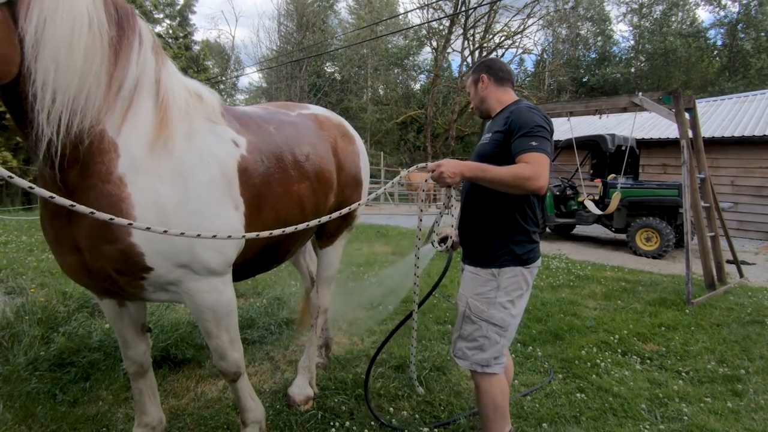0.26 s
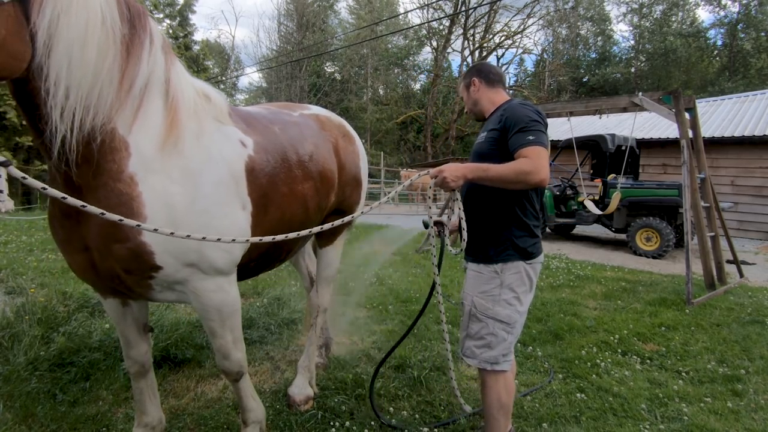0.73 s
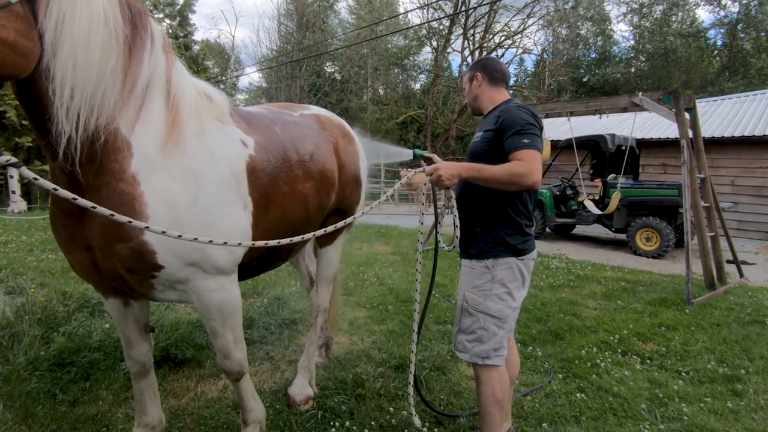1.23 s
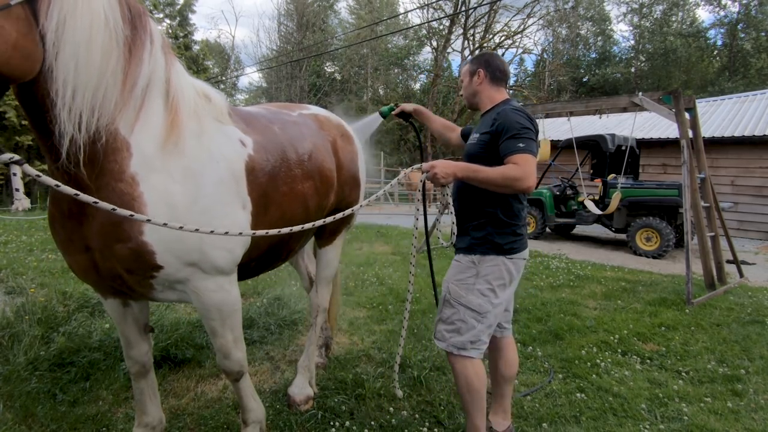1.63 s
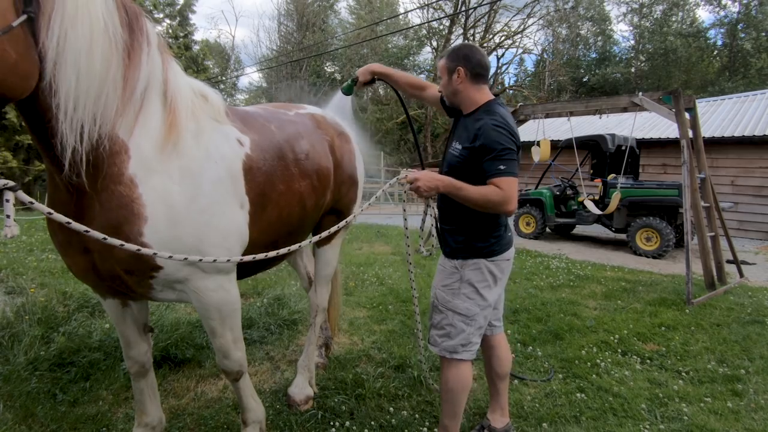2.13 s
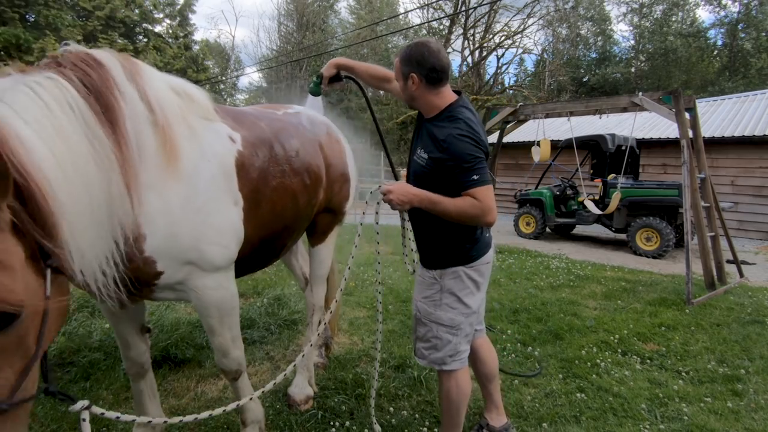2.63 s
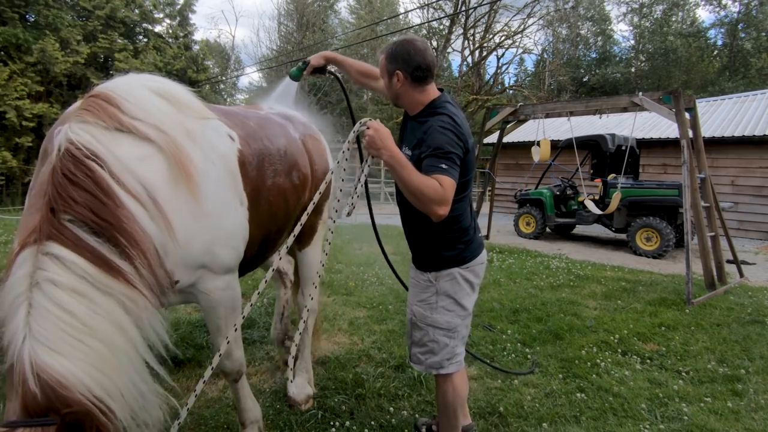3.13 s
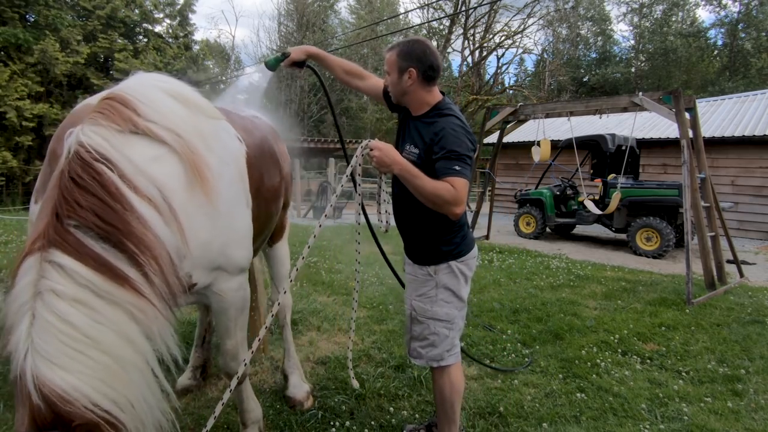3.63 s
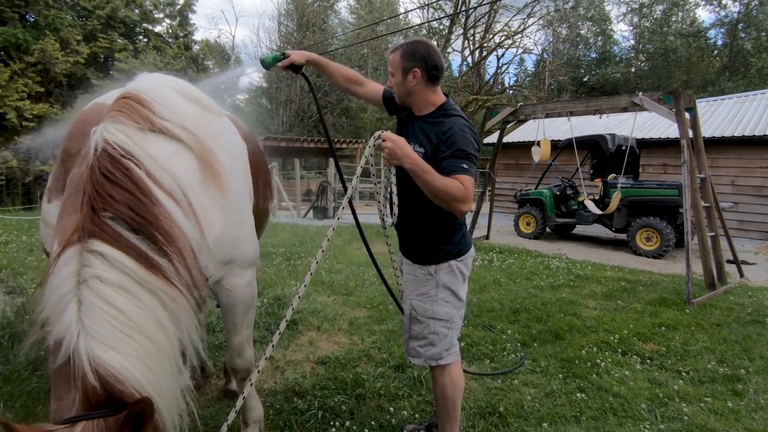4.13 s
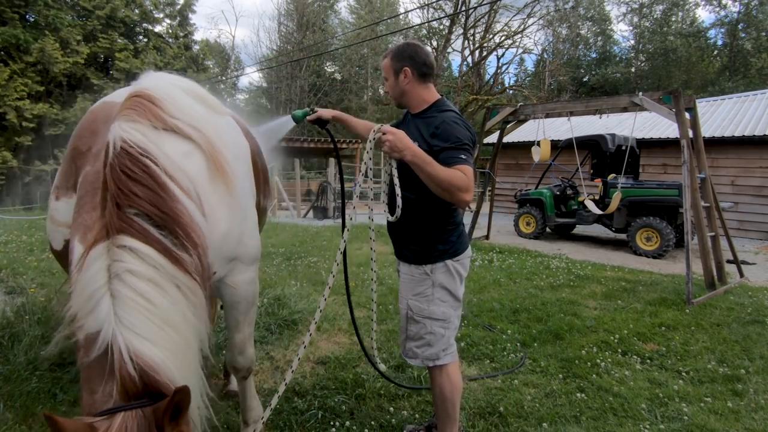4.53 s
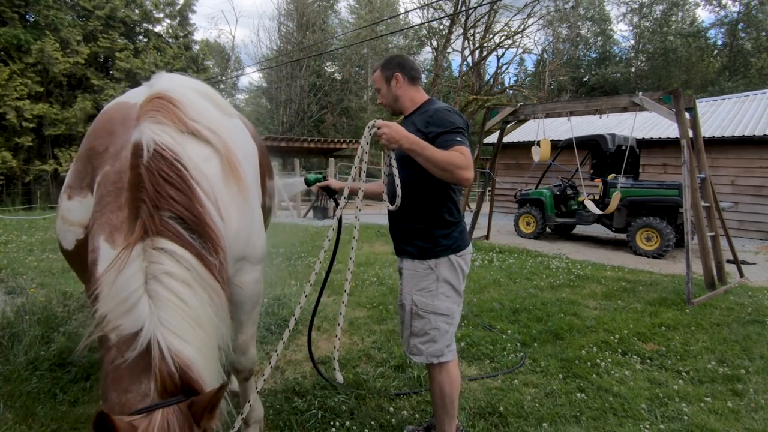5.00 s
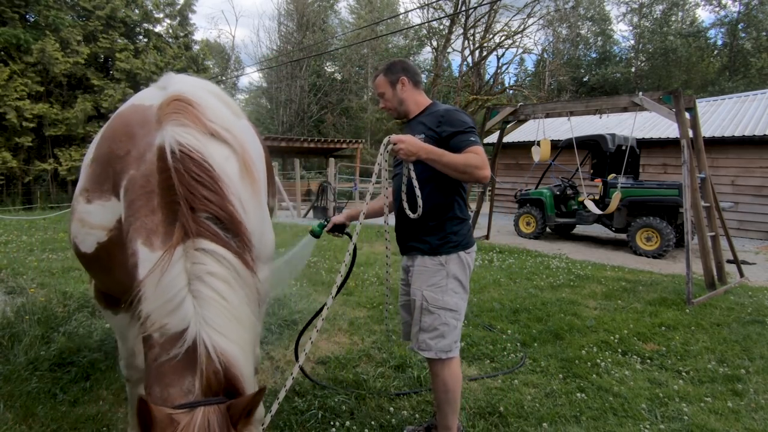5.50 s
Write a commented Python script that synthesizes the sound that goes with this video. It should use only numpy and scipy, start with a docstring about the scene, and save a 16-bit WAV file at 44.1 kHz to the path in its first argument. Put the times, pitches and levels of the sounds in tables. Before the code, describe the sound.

Outdoors, water spray swishes on and off wet horsehair over a low engine throb, a brief bird chirp and later gusts of wind.

```python
"""Garden hose on a horse

A jet sweeps on and off a horse's coat on a lawn: random impacts, thousands a second, are filtered into
splash, deeper patter and a fine hiss of mist. An engine of harmonic tones and noise throbs in the yard
and fades. Filtered noise makes wind at the microphone, gliding sines a bird, and a steady stream of
filtered impacts the wash of trees and of water falling in the grass."""
import sys
import numpy as np
from scipy import signal
from scipy.fft import rfft, irfft
from scipy.io import wavfile

SR = 44100
rng = np.random.default_rng(int(sys.argv[2]) if len(sys.argv) > 2 else 0)


def wav_record(signal):
    """Record a signal, one row per channel, as 16-bit PCM in the file named by sys.argv[1]."""
    frames = np.transpose(np.atleast_2d(signal))
    bounded = np.clip(frames, -1, 1)
    # unit amplitude maps onto the largest positive 16-bit level
    quanta = np.round(bounded * 32767).astype(np.int16)
    wavfile.write(sys.argv[1], SR, quanta)


N = 254016
TIME = np.arange(N) / SR  # s

# Wind-noise spectra, shared by gusts and buffets: (frequency [Hz], relative density [dB per Hz])
RUMBLE_COLOUR = [(25, -35), (50, -27), (75, -30), (100, -9.5), (150, 5.5), (215, -3), (300, -19),
                 (600, -56)]
RUSTLE_COLOUR = [(120, -11), (280, 6), (400, 1), (650, -5), (850, -8), (1200, -13.5)]


def from_db(db):
    """Amplitude ratio: 20 dB is a factor of ten."""
    return 10 ** (np.asarray(db) / 20)


def unit(x):
    """Normalisation: scales a signal to rms 1."""
    return x / np.sqrt(np.mean(x ** 2) + 1e-20)


def at_hz(points, hz):
    """Linear interpolation of a spectrum table on a logarithmic frequency axis."""
    f, value = np.transpose(points)
    return np.interp(np.log(hz + 1), np.log(f + 1), value)


def levels(rows):
    """Envelopes: each dB column of a time table, interpolated in dB and returned as gain."""
    s, *columns = np.transpose(rows)
    return [from_db(np.interp(TIME, s, column)) for column in columns]


def swells(rows, column, edge, spread=1):
    """Power addition of bell-shaped events, each with its own rise and fall time."""
    power = np.zeros(N)
    for row in rows:
        s, rise_s, fall_s = row[:3]
        width_s = spread * np.where(TIME < s, rise_s, fall_s)
        away = abs((TIME - s) / width_s)
        near = away < 4  # the bell is negligible beyond four widths
        bell = np.exp(-away[near] ** edge)
        power[near] += (from_db(row[column]) * bell) ** 2
    return np.sqrt(power)


def noise():
    """White Gaussian noise: two independent rows of equal power at all frequencies."""
    return rng.standard_normal((2, N))


def wander(rate_hz):
    """Random modulation: noise low-passed at rate_hz and scaled to rms 1."""
    hz = np.fft.rfftfreq(N, 1 / SR)
    low_pass = 1 / (1 + (hz / rate_hz) ** 4)
    return unit(irfft(rfft(rng.standard_normal(N)) * low_pass, N))


def drops(per_s, spread_db):
    """Shot noise: random impacts with exponentially distributed dB sizes, in two independent rows."""
    size = from_db(abs(spread_db) * np.minimum(rng.exponential(1, (2, N)), 6))
    lands = rng.random((2, N)) < per_s / SR
    hits = size * np.sign(noise()) * lands
    return np.array([unit(row) for row in hits])


def heard(drive, colour, direct=1):
    """Partial coherence: colours a source at two ports, setting their likeness, phase and balance."""
    # Coherence of the ports, clipped to 0-1 once scaled by direct: (frequency [Hz], likeness [1])
    likeness = [(60, 10), (150, 1.1), (350, 0.3), (700, 0.2), (1500, -0.48), (3000, 1.7), (6500, 0.5),
                (8500, 2), (14000, -3)]
    # Phase by which the left port leads: (frequency [Hz], lead [rad])
    port_phase = [(60, -0.45), (280, 0.68), (690, 2.68), (1300, 1.76), (2200, 0.85), (4100, 0.68),
                  (5200, -0.59), (6700, 0.75), (7700, 1.93), (10000, 1.36), (15000, -2)]
    # Left level minus right level: (frequency [Hz], difference [dB])
    port_balance = [(60, -7.5), (200, -4.5), (400, -7.5), (700, -4.5), (1300, 0), (2400, .5), (3600, -1),
                    (4600, -5.5), (6200, -11.5), (7300, -14.5), (8500, -2), (10500, -2.5), (14500, -8)]
    hz = np.fft.rfftfreq(N, 1 / SR)
    near, around = rfft(drive)  # the second row stands for what arrives from all around
    same = np.clip(direct * at_hz(likeness, hz), 0, 1)
    left = same * near + np.sqrt(1 - same ** 2) * around
    lead = from_db(at_hz(port_balance, hz)) * np.exp(1j * at_hz(port_phase, hz))
    # Dividing by the expected sum gives the mean of the ports the table's colour
    summed = np.sqrt(1 + abs(lead) ** 2 + 2 * same * lead.real)
    roll_off = np.maximum(hz / colour[-1][0], 1) ** -4  # above the table's last frequency
    shape = from_db(at_hz(colour, hz)) * roll_off / summed
    pair = irfft(np.array([left * lead, near]) * shape, N)
    return pair / pair.mean(0).std()  # the mean of the ports has rms 1


def centred(x, centre_hz, lift_db, octaves):
    """Resonance: a broad spectral peak that glides with centre_hz."""
    hz, t, z = signal.stft(x, SR, nperseg=512)
    away = np.log2((hz[:, None] + 1) / np.interp(t, TIME, centre_hz)) / octaves
    peak = from_db(lift_db * np.exp(-away ** 2))
    return signal.istft(z * peak, SR, nperseg=512)[1][:, :N]


def patchy(x, depth_db, width_hz, length_s):
    """Short-lived resonances: the wet hair and the water film keep changing shape."""
    hz, t, z = signal.stft(x, SR, nperseg=512)
    field = np.fft.rfft2(rng.standard_normal((len(t), len(hz))))
    along = np.fft.fftfreq(len(t), t[1])[:, None]
    across = np.fft.rfftfreq(len(hz), hz[1])
    # Smooth the random field over time and frequency
    field *= np.exp(-(along * length_s) ** 2 - (across * width_hz) ** 2)
    patches = unit(np.fft.irfft2(field, (len(t), len(hz)))).T
    return signal.istft(z * from_db(depth_db * patches), SR, nperseg=512)[1][:, :N]


def spray():
    """Impact noise: small drops splash, larger ones patter on the coat, and the finest hiss."""
    # Spectra of the three parts: (frequency [Hz], relative density [dB per Hz])
    splash_colour = [(1500, -55), (2300, -9.5), (3100, -5), (3700, -4.5), (4400, -4), (5100, -4),
                     (6100, 0.5), (7100, -1), (8100, -16.5), (10000, -35), (15000, -94)]
    patter_colour = [(500, -36), (1000, -15.5), (1250, -6), (1550, 1.5), (1900, 2), (2600, 0), (3300, -2),
                     (4500, -10.5), (7000, -57)]
    mist_colour = [(2000, -37), (4800, 5), (6000, 12), (7200, 9.5), (8200, -3.5), (10000, -3), (11000, -10),
                   (12000, -13.5), (15000, -17)]
    # Sweeps of the jet across the horse, levels relative:
    # (time of height [s], rise [s], fall [s], splash [dB], patter [dB], mist [dB])
    sweeps = [(0.199, 0.051, 0.062, -39.5, -47, -55), (0.517, 0.056, 0.085, -37, -48, -56),
              (0.628, 0.028, 0.022, -43, -46, -58.5), (0.805, 0.023, .021, -37, -39, -58),
              (0.89, 0.077, 0.06, -34, -44.5, -48), (1.11, 0.041, 0.03, -38, -42.5, -51.5),
              (1.315, 0.093, 0.023, -34.5, -64, -46), (1.68, 0.052, 0.14, -46, -37.5, -43.5),
              (1.955, 0.058, 0.048, -32, -35.5, -39.5), (2.02, 0.047, 0.038, -51, -35.5, -38),
              (2.15, 0.076, 0.077, -50, -38, -43.5), (2.295, 0.049, 0.058, -26.5, -40, -38.5),
              (2.36, 0.047, 0.078, -33, -33.5, -34.5), (2.544, 0.05, 0.066, -32.5, -34.5, -54),
              (2.66, 0.085, 0.079, -28.5, -36, -33.5), (2.918, 0.051, .088, -28.5, -34, -35.5),
              (3.195, .058, 0.063, -31.5, -32.5, -37), (3.43, 0.064, 0.11, -33, -35.5, -41.5),
              (3.555, 0.058, 0.063, -41, -59, -37.5), (3.752, 0.084, 0.093, -38.5, -35.5, -49.5),
              (3.866, .054, .07, -46, -53, -44), (4.025, 0.02, 0.039, -56, -42, -63),
              (4.11, 0.063, 0.085, -38.5, -36, -57), (4.28, 0.064, 0.067, -43, -40, -45),
              (4.43, 0.051, 0.066, -41, -39.5, -47), (4.555, 0.089, 0.11, -29, -46, -43),
              (4.706, 0.15, .045, -34, -65, -44), (5.007, 0.073, 0.084, -32, -55, -46),
              (5.435, 0.12, 0.057, -36, -47.5, -46), (5.745, .028, .08, -31, -48, -49)]
    # Fringe of the spray that keeps landing between sweeps: (time [s], relative splash level [dB])
    fringe_level = [(0, -48), (1.3, -44.5), (1.6, -35.5), (2.3, -59), (3.3, -47), (4.1, -49), (4.8, -46),
                    (5.76, -47)]
    jet_edge = 1.95  # exponent of the bell; 2 is Gaussian
    soft_hz, firm_hz = 2530, 3640  # low on the soft coat, high when glancing off the firm flank
    miss_s, miss_half_s, miss_db = 1.45, 0.097, -14  # the jet misses as the nozzle is raised

    # Patter and mist fan out wider than the core of the jet
    fringe, = levels(fringe_level)
    core = np.hypot(swells(sweeps, 3, jet_edge), fringe)
    coat = np.hypot(swells(sweeps, 4, jet_edge, spread=1.5), from_db(-8.5) * fringe)
    haze = np.hypot(swells(sweeps, 5, jet_edge, spread=1.6), from_db(-10.5) * fringe)

    splash = core * heard(drops(per_s=16000, spread_db=2.5), splash_colour)
    patter = coat * heard(drops(per_s=7000, spread_db=2.0), patter_colour)
    mist = haze * heard(drops(per_s=17000, spread_db=0.0), mist_colour)

    centre_hz = soft_hz + (firm_hz - soft_hz) * core / (core + coat)
    on_coat = from_db(-0.57) * centred(splash + patter, centre_hz, lift_db=2.0, octaves=0.61)
    miss = np.exp(-((TIME - miss_s) / miss_half_s) ** 6)
    landing = 1 - (1 - from_db(miss_db)) * miss
    sputter = from_db(0.7 * wander(rate_hz=28))
    return patchy((on_coat + mist) * landing * sputter, depth_db=1.86, width_hz=510, length_s=0.1)


def engine():
    """Beating harmonics: tones beside the firing tone align with it once a cycle, so it throbs."""
    # Level of the engine: (time [s], relative level [dB])
    engine_level = [(0, -33.5), (0.2, -30.5), (0.42, -35.5), (0.68, -48), (0.81, -34.5), (1.5, -34.5),
                    (1.7, -39.5), (2.03, -34), (2.6, -43), (2.82, -39.5), (3.12, -52), (4.2, -59.5)]
    # Harmonics of the engine cycle: (multiple of the cycle rate [1], relative level [dB])
    engine_tones = [(1, -53), (2, -53), (3, -52), (4, -38), (5, -20.5), (6, -39), (7, -33), (8, 6),
                    (9, 1.5), (10, -49), (11, -4), (12, -37), (13, -9), (14, -6), (15, -21), (16, -10),
                    (17, -25), (18, -26), (19, -18.5), (20, -18), (21, -50), (22, -57)]
    cycle_hz, throb_s = 11.59, 0.835  # mean cycle rate; time about which the phases align
    order, db = np.transpose(engine_tones)
    firing = order[np.argmax(db)]
    turns = cycle_hz * (TIME - throb_s) + 0.0085 * wander(rate_hz=7.6)  # cycles, with jitter
    # Phases are aligned beside the firing tone and increasingly random away from it
    looseness = np.clip((abs(order - firing) - 1) / 3, 0, 1)
    phases = looseness * rng.uniform(-np.pi, np.pi, len(order))
    tones = np.zeros(N)
    for multiple, tone_db, phase in zip(order, db, phases):
        tones += from_db(tone_db) * np.cos(2 * np.pi * multiple * turns + phase)
    flutter = from_db(1.37 * wander(rate_hz=18))
    hum = unit(tones) * levels(engine_level)[0] * flutter
    return hum * from_db([[-3.2], [2.8]])  # left, right


def drone():
    """Broadband exhaust noise: the engine's rough part, filtered noise that falls silent."""
    # Level of the exhaust noise: (time [s], relative level [dB])
    drone_level = [(0, -42), (0.5, -36.5), (1.7, -48.5), (2.6, -55), (3.3, -47.5)]
    # Spectrum of the exhaust noise: (frequency [Hz], relative density [dB per Hz])
    drone_colour = [(50, -42), (110, -9), (165, 3.5), (215, -0.5), (270, -15.5), (350, -18), (500, -25.5)]
    fade = np.clip((drone_level[-1][0] - TIME) / 0.13, 0, 1)  # the last 0.13 s runs to silence
    return from_db(1) * fade * levels(drone_level)[0] * heard(noise(), drone_colour)


def bird(echo_s=0.049, echo_db=-9):
    """Frequency modulation: two peeps, then a hoarse arched chirp of two voices; the shed echoes them."""
    # Glides of the chirp's voices: (time [s], upper mean pitch [Hz], lower mean pitch [Hz])
    chirp_pitch = [(1.39, 3800, 3800), (1.42, 4560, 4450), (1.445, 4600, 3900), (1.475, 4680, 3330),
                   (1.492, 4000, 3300), (1.515, 3300, 3250)]
    # Short peeps: (time of height [s], pitch [Hz], relative level [dB])
    peeps = [(0.33, 4030, -46), (0.478, 2800, -37)]
    chirp_db, lower_voice_db, chirp_fade_s, peep_s = -49, -3.5, 0.022, 0.0075
    s, upper, lower = np.transpose(chirp_pitch)
    call = np.zeros(N)
    for pitch, db in ((upper, 0), (lower, lower_voice_db)):
        hoarse = 1 + 0.04 * wander(rate_hz=500)
        hz = np.interp(TIME, s, pitch) * hoarse
        call += from_db(db) * np.sin(2 * np.pi * np.cumsum(hz) / SR)
    ends = np.minimum(TIME - s[0], s[-1] - TIME)
    call *= from_db(chirp_db) * np.clip(ends / chirp_fade_s, 0, 1)
    for at, hz, db in peeps:
        bell = np.exp(-((TIME - at) / peep_s) ** 2)
        call += from_db(db) * bell * np.sin(2 * np.pi * hz * TIME)
    echo = from_db(echo_db) * np.interp(TIME - echo_s, TIME, call)
    return (call + echo) * from_db([[-1], [1.5]])  # left, right


def wind(boom_from_db=-30):
    """Turbulent pressure: eddies, partly unlike at the ports, rumble, rustle and boom in strong gusts."""
    # Gusts, levels relative: (time of height [s], rise [s], fall [s], rumble [dB], rustle [dB])
    gusts = [(0.32, 0.058, 0.059, -30, -40.5), (3.657, 0.08, 0.035, -37.5, -38.5),
             (3.749, 0.024, 0.059, -33, -38.5), (3.87, 0.067, 0.065, -32.5, -35),
             (3.945, 0.057, 0.073, -31, -58), (4.207, 0.031, 0.023, -38.5, -54),
             (4.377, 0.057, 0.045, -49, -41.5), (4.43, 0.016, 0.069, -34, -47),
             (4.946, 0.067, 0.087, -37, -46.5), (5.27, 0.09, .08, -43, -34.5),
             (5.464, 0.084, 0.058, -37.5, -40.5), (5.55, 0.067, 0.074, -30.5, -60)]
    # Light breeze under the later gusts: (time [s], relative rumble [dB], relative rustle [dB])
    breeze = [(3.1, -80, -80), (3.5, -46.5, -51.5), (4.6, -43.5, -51), (4.8, -51, -53), (5.4, -44.5, -78),
              (5.76, -51, -66)]
    # Spectrum of the deep boom: (frequency [Hz], relative density [dB per Hz])
    boom_colour = [(25, -60), (65, -30), (95, -7), (130, -3), (200, -42)]
    gust_edge = 1.64  # exponent of the bell
    calm_rumble, calm_rustle = levels(breeze)
    rumble_gain = np.hypot(swells(gusts, 3, gust_edge), calm_rumble)
    rustle_gain = np.hypot(swells(gusts, 4, gust_edge), calm_rustle)
    rumble = from_db(-0.5) * rumble_gain * heard(noise(), RUMBLE_COLOUR, direct=0.54)
    flutter = from_db(1.9 * wander(rate_hz=240))
    rustle = from_db(-2.0) * rustle_gain * heard(noise(), RUSTLE_COLOUR, direct=0.63) * flutter
    force = np.minimum(rumble_gain / from_db(boom_from_db), 1)  # weak gusts boom less
    boom = from_db(0.5) * force * rumble_gain * heard(noise(), boom_colour, direct=0.32)
    return (rumble + boom) * from_db([[-4], [1.1]]) + rustle  # left, right


def buffets(rise_s=0.0049, peak_db=-12):
    """Transient pressure: single eddies strike the microphone with a short, dull puff."""
    # Sharp buffets: (onset [s], strength before peak_db is added [dB])
    strikes = [(3.613, -24), (3.665, -18), (3.74, -26), (3.824, -16), (4.412, -24), (4.852, -23.5),
               (5.295, -13.5)]
    strength = np.zeros(N)
    for s, db in strikes:
        age = np.maximum(TIME - s, 0) / rise_s
        strength += from_db(db + peak_db) * age * np.exp(1 - age)  # peaks rise_s after the onset
    rumble = heard(noise(), RUMBLE_COLOUR, direct=0.51)
    rustle = heard(noise(), RUSTLE_COLOUR, direct=0.21)
    return strength * (rumble + 0.5 * rustle)


def yard():
    """Superposed impacts: a wash from distant trees and from water landing in the grass."""
    # Spectrum of the wash: (frequency [Hz], relative density [dB per Hz])
    yard_colour = [(25, -34), (60, -1), (110, 13), (200, 10.5), (330, -0.5), (530, -6.5), (750, 2),
                   (1150, -0.5), (1550, 4), (2100, -6), (3300, -10), (4900, -12.5), (6600, -3.5),
                   (8300, -18.5), (11500, -52)]
    # Level of the wash: (time [s], relative level [dB])
    yard_level = [(0, -43), (0.7, -42.5), (1.2, -43), (1.45, -46), (2.3, -43), (3.3, -45), (4.2, -48.5),
                  (5.0, -44.5), (5.76, -48)]
    return levels(yard_level)[0] * heard(drops(per_s=9000, spread_db=2.5), yard_colour)


def scene():
    """Superposition: the pressures of all sources add at the microphone."""
    return spray() + engine() + drone() + bird() + wind() + buffets() + yard()


def record(dry, low_cut_hz=48, edge_hz=15700):
    """Band limiting: the microphone's bass cut and the recorder's upper edge."""
    hz = np.fft.rfftfreq(N, 1 / SR)
    bass_cut = 1 / np.sqrt(1 + (low_cut_hz / (hz + 1)) ** 6)
    thinned = irfft(rfft(dry) * bass_cut, N)
    low_pass = signal.firwin(511, edge_hz, window=("kaiser", 9), fs=SR)
    return signal.oaconvolve(thinned, low_pass[None], "same")


dry = scene()
out = record(dry)
wav_record(out)
```